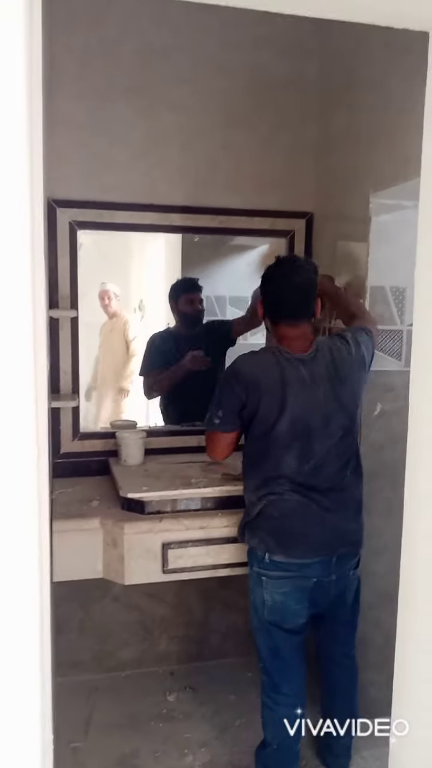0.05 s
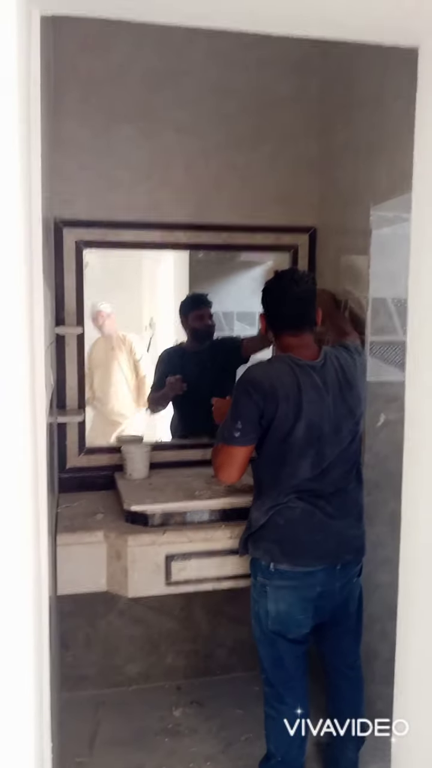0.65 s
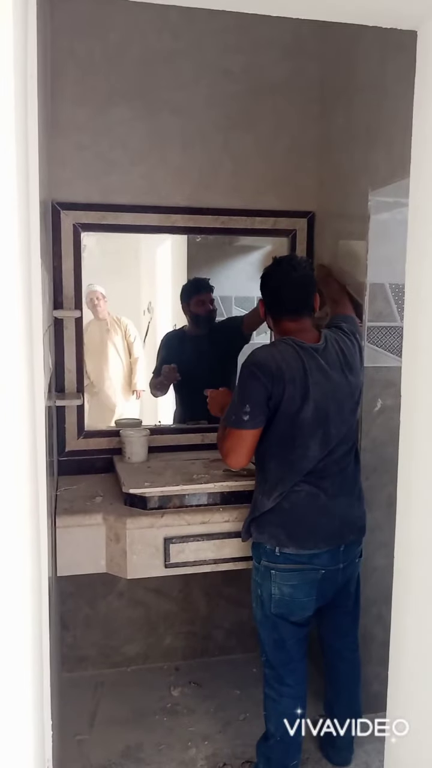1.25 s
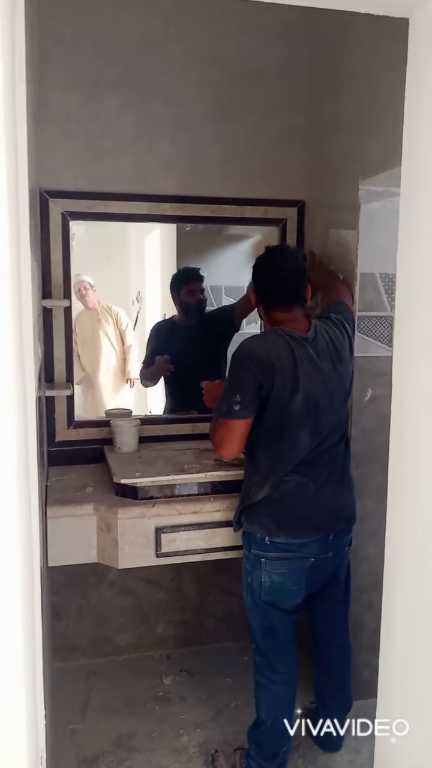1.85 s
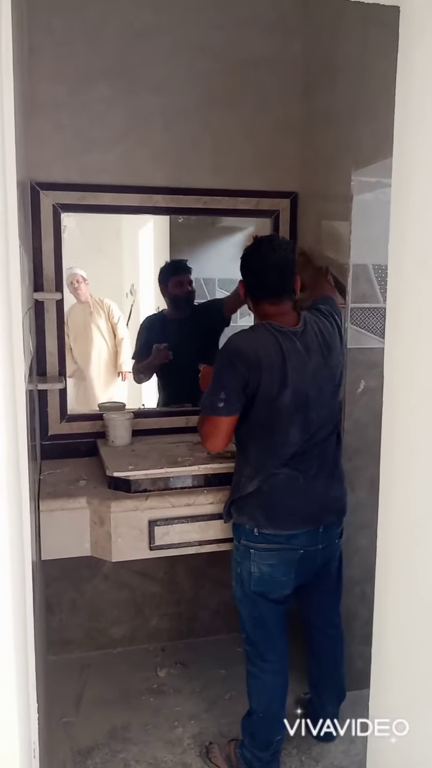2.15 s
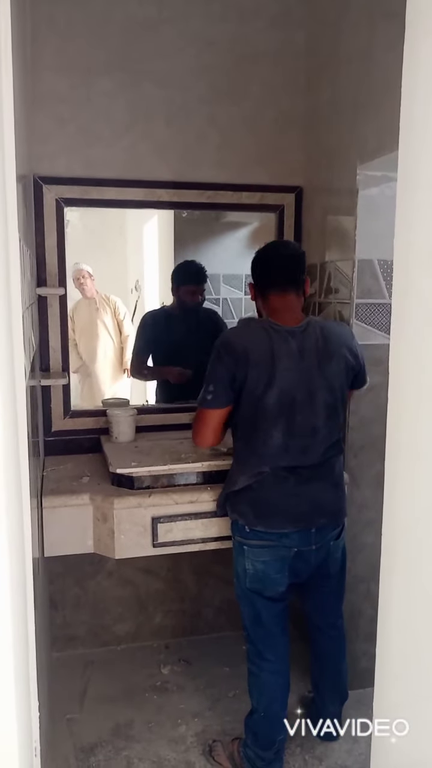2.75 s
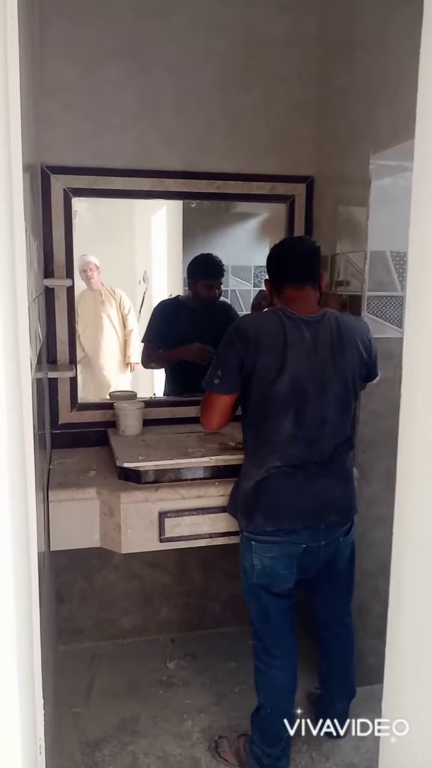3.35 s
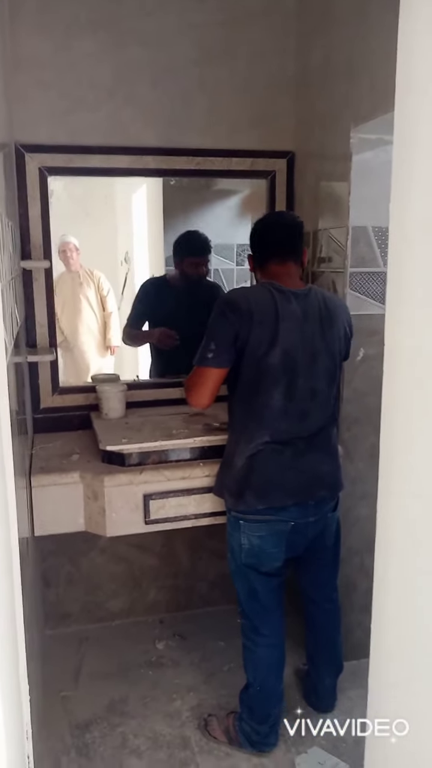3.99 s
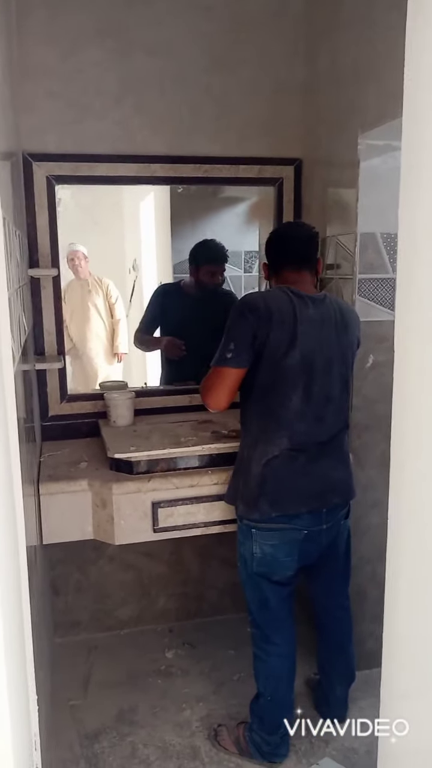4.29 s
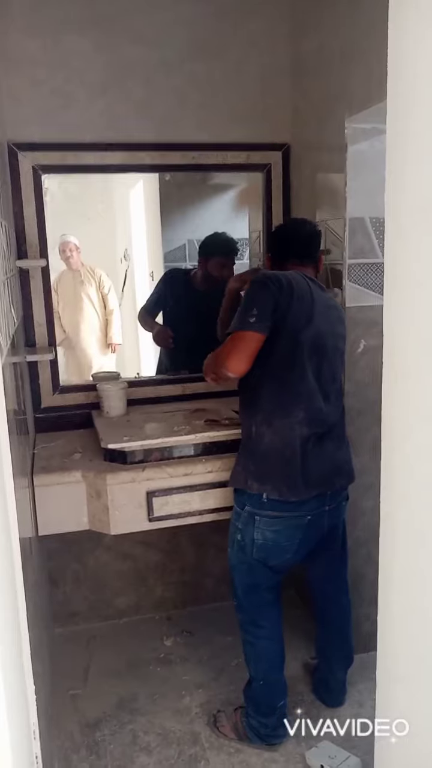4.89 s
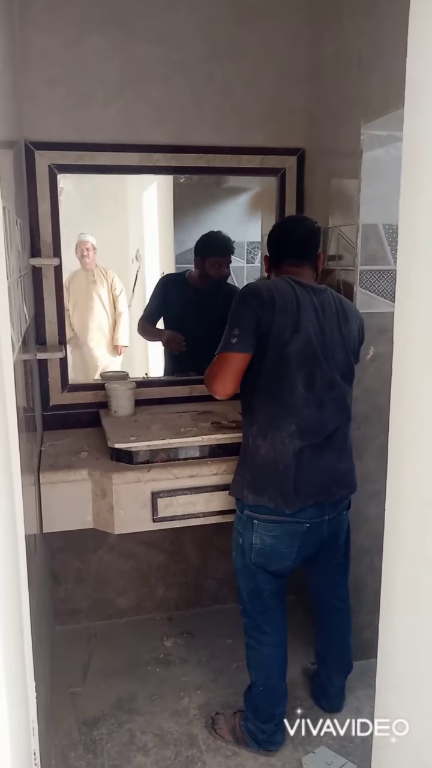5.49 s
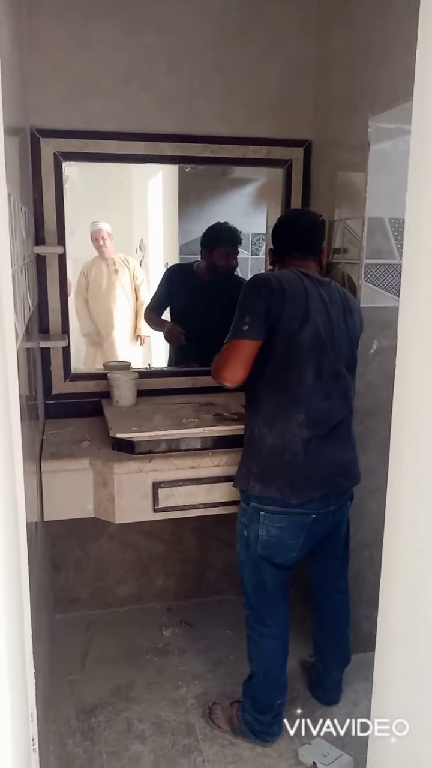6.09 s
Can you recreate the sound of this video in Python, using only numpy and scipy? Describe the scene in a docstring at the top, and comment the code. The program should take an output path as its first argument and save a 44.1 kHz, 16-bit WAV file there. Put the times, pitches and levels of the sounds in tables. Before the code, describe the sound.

Quick metal scrapes on marble, with gritty crunches, ringing clinks and one thin squeal, echo off hard bare walls.

```python
"""A worker scrapes and picks at marble with a steel blade in a small bare bathroom.
Sharp jabs come first: the edge hisses over the stone, rings, clinks and chirps where it catches,
and grit crunches dully where it digs in. Past three seconds a few clinks stand out in a lull.
At four seconds the edge sticks and slips in one thin squeal; softer sweeps and two last clinks follow.
The hard walls answer throughout, over a low murmur of air in the building."""
import sys
import numpy as np
from scipy import signal
from scipy.fft import rfft, irfft, next_fast_len
from scipy.io import wavfile
from scipy.ndimage import uniform_filter1d

SR = 44100
rng = np.random.default_rng(int(sys.argv[2]) if len(sys.argv) > 2 else 0)


def bounce(signal):
    """Save signal as a 16-bit WAV file at the path given by the first command-line argument."""
    frames = np.transpose(np.atleast_2d(signal))
    limited = np.clip(frames, -1, 1)
    pcm = np.round(limited * 32767).astype(np.int16)
    wavfile.write(sys.argv[1], SR, pcm)


N = 270333

# Tone colour of steel on stone: freq_hz, gain_db
EDGE_SPECTRUM = [(30, -55), (100, -18), (300, -14.5), (600, -6), (1000, -2.5), (1600, -0.5), (2000, -2),
                 (3300, 1.5), (5000, 0.5), (7100, 0.5), (7900, -9.5), (10300, -8), (11200, -15),
                 (13400, -18.5), (14700, -8)]
# Strokes of the edge: start_s, length_s, level_db, fizz_db, body_db
EDGE_STROKES = [ (0, 0.13, -44.5, 6, 9.5), (.184, 0.04, -24, -4, -3), (.342, 0.034, -23.5, -1.5, -4.5),
                (0.428, 0.033, -27.5, -4, -3), (0.461, 0.051, -25.5, 1, 4), (.576, 0.051, -24, 0.5, -3),
                (0.699, 0.037, -23, -3, 0.5), (.749, 0.01, -22.5, -2, 2), (.808, 0.028, -21.5, 1.5, 1),
                (.932, 0.077, -23, -0.5, 6), (1.042, 0.0067, -12, -5, -1), (1.05, 0.1, -24, 0, 3),
                (1.26, 0.17, -47, 10, -10), (1.374, .02, -26.5, -8.5, -5), (1.447, .03, -38, 23, -6),
                (1.478, .084, -32.5, 3, -7), (1.629, 0.038, -23.5, 0.5, -2.5),
                (1.796, 0.058, -32.5, 0.5, 7), (1.96, 0.031, -41, 3, 10), (2.057, .02, -28, -3, 6.5),
                (2.163, .02, -28, -11, 9), (2.323, 0.016, -19.5, -8, -7), (2.353, .04, -34, 4, 2),
                (2.394, 0.037, -21.5, 4, 1.5), (2.68, 0.048, -46, -3, -28), (2.98, 0.022, -20, -3, -20),
                (3.122, 0.0098, -23.5, -1.5, -10), (3.544, 0.14, -51.5, 10, 0),
                (3.65, 0.066, -36, 7.5, -13), (3.686, 0.038, -22, -14, 9.5), (3.812, .033, -28.5, -1, -2),
                (3.843, 0.071, -22, -5, 10), (3.988, 0.015, -25, 4.5, -3), (4.12, .07, -33, 2, 7),
                (4.183, 0.021, -19, -1, -18), (4.205, 0.018, -20.5, 7.5, 4), (4.327, .011, -18.5, -1, -21),
                (4.338, .039, -27, 6, 8), (4.4, .07, -29, 2, 2.5), (4.75, 0.025, -39.5, 3, 8),
                (4.835, 0.05, -33.5, 0.5, -6), (4.87, 0.06, -28.5, 3, 6), (4.985, 0.039, -30, 0, -4),
                (5.02, .052, -24, 2, 3), (5.074, 0.099, -31, 1, 2), (5.135, 0.048, -22, 4.5, 6),
                (5.185, 0.045, -26.5, -2, 6), (5.222, 0.039, -21.5, -1, -2), (5.274, 0.071, -32, 1, 0),
                (5.34, .027, -19.5, 1.5, -5), (5.452, 0.032, -34.5, 9, 10), (5.61, 0.042, -30.5, -2, -5),
                (5.715, 0.13, -32, 1.5, -11.5), (5.86, 0.075, -24.5, -0.5, -3.5),
                (5.95, 0.068, -26.5, 0, -9), (6.02, 0.076, -24.5, 5, -1.5), (6.105, 0.054, -26, 2, -1)]
SWEEPS_FROM_S = 4.39  # sharp jabs until here, softer sweeps after
JAB_RISE, SWEEP_RISE = 0.11, 0.27  # share of a stroke spent bearing down

def edge_scrapes():
    """The edge skips over fine grains; each stroke touches the stone a little differently."""
    out = np.zeros(N)
    for start_s, length_s, level_db, fizz_db, body_db in EDGE_STROKES:
        rise_s = length_s * (JAB_RISE if start_s < SWEEPS_FROM_S else SWEEP_RISE)
        push = pressure(rise_s, length_s, sag_db=6.5, release_s=0.0023, trail_db=-13.5, trail_s=0.081)
        grit = grains(len(push), per_s=2200, spread_db=2.0, dust=1.0)
        hiss = coloured(grit, EDGE_SPECTRUM, fizz_db, body_db, ripple_db=2.0)
        add(out, start_s, gain_of(level_db) * pressed(hiss, push))
    return out


# Tone colour of breaking grit: freq_hz, gain_db
GRIT_SPECTRUM = [(30, -62), (100, -22), (260, -18), (400, 0.5), (520, 5), (750, 1), (1100, -1.5), (1600, 0),
                 (2100, -10), (3200, -14.5), (8000, -42), (16000, -31)]
# Digs into the grit: start_s, length_s, level_db
GRIT_DIGS = [(.812, 0.067, -29.5), (.934, 0.066, -24), (1.039, 0.1, -25.5), (1.241, 0.15, -38.5),
             (1.386, 0.017, -27.5), (1.483, 0.11, -27.5), (1.599, 0.12, -33.5), (1.742, 0.018, -23.5),
             (1.845, .02, -28), (1.963, 0.14, -41.5), (2.231, 0.023, -22), (2.978, 0.036, -20),
             (3.122, 0.0098, -19.5), (3.151, 0.053, -42), (3.686, 0.093, -25.5), (3.86, 0.077, -23),
             (4.666, 0.078, -40.5)]

def grit_crunches():
    """Coarse grit breaks under the blade in dull, uneven knocks, then keeps crumbling."""
    out = np.zeros(N)
    for start_s, length_s, level_db in GRIT_DIGS:
        rise_s = 0.073 * length_s
        push = pressure(rise_s, length_s, sag_db=8.0, release_s=0.0047, trail_db=-13, trail_s=0.083)
        grit = grains(len(push), per_s=500, spread_db=5.5, dust=0.67)
        crunch = coloured(grit, GRIT_SPECTRUM, ripple_db=3.0)
        add(out, start_s, gain_of(level_db) * pressed(crunch, push))
    return out


# Modes of the free blade: pitch_hz, t60_s, side_hit_db, tip_hit_db, scraped_db
BLADE_MODES = [(856.4, 0.21, 2.5, -11.5, 10.5), (1536, 0.42, -3, 0.5, 7), (1596, 0.46, -11, -17, 1),
               (2310, 0.45, -13, -21.5, -3), (2690, 0.46, -33, -27, 6), (2400, 0.37, -21, -24, 5),
               (3310, 0.54, -11, -18, -38), (3312, 0.29, 3, -6.5, -0.5), (3840, 0.037, 11.5, -29, -5),
               (4230, 0.11, 0, -19, -14), (5060, 0.15, -22, -32, -27), (5650, 0.28, -18, -30, -9),
               (5650, 0.3, -1, -28, 6), (6380, 0.12, -6, -26, -4), (7110, 0.24, -21, -34, -27),
               (7240, 0.22, -25, -6.5, -20), (8600, 0.29, -37, -28, 5), (9500, 0.2, -25, -30, -1),
               (10400, 0.18, -16, -20, -24), (12290, .2, -27, -35, -24), (14400, 0.14, -24, -7, -20),
               (14560, .22, -25, -20, 0)]
# Modes of the blade bent against the stone: pitch_hz, t60_s, gain_db
BENT_MODES = [(1109, 0.23, -2.5), (1240, .3, -23), (1367, 0.19, -4), (1970, 0.28, 1.5)]
# How hard the strokes drive the bent modes: time_s, drive_db
BEND_DRIVE = [(0, -37), (4.1, -37), (4.22, -13.5), (4.45, -30), (4.8, -45), (5.1, -36), (5.3, -7.5),
              (5.45, -10.5), (5.65, -37)]

def blade_ring(scrapes):
    """The strokes keep the steel ringing, free or bent; contact with the stone shortens the ring."""
    pitch_hz, t60_s, _, _, scraped_db = np.transpose(BLADE_MODES)
    free = driven(scrapes, pitch_hz, t60_s * 0.39, scraped_db, detune=0.0085)
    bent = driven(scrapes * gain_of(follow(BEND_DRIVE)), *np.transpose(BENT_MODES), detune=0.0026)
    return gain_of(-13.5) * free + bent


# Knocks of the blade: start_s, tick_db, fizz_db, ring_db, place (0 side, 1 tip)
BLADE_CLINKS = [(.186, -24, -10, -34, 0.52), (.345, -30, 3, -35, .3), (2.059, -19, -3, -36.5, .7),
                (2.405, -41, 0, -27, 0.26), (3.346, -16, 1.5, -23, 1), (3.443, -35, -32, -34, 0.43),
                (3.523, -32, -32, -44, 0.5), (3.990, -23, -6, -29.5, 0.63), (5.444, -12, -15, -49, 0.13),
                (5.603, -18.5, -2, -24.5, 0.023)]

def blade_clinks():
    """A sharp tick, then the blade rings by where it was struck; returns ticks and rings."""
    pitch_hz, t60_s, side_db, tip_db, _ = np.transpose(BLADE_MODES)
    ticks, rings = np.zeros((2, N))
    t = np.arange(SR // 10) / SR
    snap = np.minimum(t / 0.0022, 1) * np.exp(-t / 0.0049)
    for start_s, tick_db, fizz_db, ring_db, place in BLADE_CLINKS:
        crack = coloured(rng.standard_normal(len(t)), EDGE_SPECTRUM, fizz_db, body_db=-9, ripple_db=2)
        add(ticks, start_s, gain_of(tick_db) * crack * snap)
        tone = ring(pitch_hz, t60_s, side_db + place * (tip_db - side_db), swell_cycles=17)
        brush_db = 2.9 * wobble(len(tone), smooth_samples=250)  # brushing the stone roughens the ring
        add(rings, start_s, gain_of(ring_db + brush_db) * tone)
    return ticks, rings


# The loudest catches of the edge: centre_s, pitch_hz, peak_db, half_length_s
LOUD_CATCHES = [(.35, 2270, -30, 0.014), (.37, 1550, -33.5, 0.022), (.752, 4370, -26, 0.0067),
                (1.07, 1421, -23, .013), (1.39, 3000, -29, 0.013), (1.66, 2670, -30.5, .03),
                (2.411, 3326, -21, .009), (2.412, 4250, -29, .03), (2.999, 6730, -23.5, 0.012),
                (3.385, 1545, -26, .03), (3.994, 5727, -23, 0.009), (4.219, 1157, -30, .018),
                (4.349, 1940, -29.5, .014), (5.17, 5560, -24.5, .035), (5.254, 3617, -27, .013),
                (5.26, 1169, -30, .025), (5.635, 3316, -28, .025), (5.762, 4220, -35.5, 0.035),
                (6.052, 6589, -23.5, 0.017), (6.055, 4070, -26.5, 0.023)]

def edge_chirps():
    """Where the edge catches, a chirp swells and dies on one trembling pitch."""
    out = np.zeros(N)
    for centre_s, pitch_hz, peak_db, half_s in LOUD_CATCHES + faint_catches():
        t = np.arange(-2 * half_s, 2 * half_s, 1 / SR)
        tremble = 1 + 0.02 * wobble(len(t), smooth_samples=70)
        phase = 2 * np.pi * np.cumsum(pitch_hz * tremble) / SR
        swell = np.exp(-(t / half_s) ** 2)
        add(out, centre_s + t[0], gain_of(peak_db) * swell * np.sin(phase))
    return out


def faint_catches(chance=0.6, below_stroke_db=10, half_s=0.016):
    """By chance a stroke catches on a mode of the blade; returns rows like LOUD_CATCHES."""
    pitches_hz = [mode[0] for mode in BLADE_MODES if 1000 < mode[0] < 7100]
    rows = []
    for start_s, length_s, level_db, _, _ in EDGE_STROKES:
        luck, along, pick = rng.random(3)
        if luck < chance and length_s > half_s:
            pitch_hz = pitches_hz[int(pick ** 1.2 * len(pitches_hz))]  # low modes catch more readily
            centre_s = start_s + half_s + along * length_s
            rows.append((centre_s, pitch_hz, level_db - below_stroke_db, half_s))
    return rows


# Contour of the squeal: time_s, pitch_hz, relative_db
SQUEAL_CONTOUR = [(4.04, 7364, -55), (4.08, 7380, -29), (4.116, 7480, -30), (4.132, 7475, -44),
                  (4.142, 7460, -27), (4.174, 7450, -36), (4.186, 7498, -28), (4.3, 7390, -45),
                  (4.32, 7500, -37)]

def edge_squeal():
    """The edge sticks and slips: a thin, unsteady whistle with a faint octave."""
    time_s, pitch_hz, relative_db = np.transpose(SQUEAL_CONTOUR)
    t = np.arange(time_s[0], time_s[-1], 1 / SR)
    waver_hz = 14 * wobble(len(t), smooth_samples=200)
    phase = 2 * np.pi * np.cumsum(np.interp(t, time_s, pitch_hz) + waver_hz) / SR
    whistle = np.sin(phase) + gain_of(-19) * np.sin(2 * phase)
    out = np.zeros(N)
    add(out, time_s[0], gain_of(np.interp(t, time_s, relative_db)) * whistle)
    return gain_of(3) * out


# Early reflections: delay_s, gain
NEAR_WALLS = [(.0031, 0.19), (.0058, -0.19), (.0094, .22)]

def wall_slaps(x):
    """The nearest walls each throw back one quick copy."""
    out = np.zeros(N)
    for delay_s, gain in NEAR_WALLS:
        add(out, delay_s, gain * x)
    return out


# Decay of the bathroom: freq_hz, t60_s
ROOM_DECAY = [(150, 0.88), (600, 0.96), (1700, 0.77), (4500, 0.55), (8000, 0.46), (14000, 0.27)]

def room_tail():
    """Dense reflections off bare stone, the treble dying first."""
    count = SR // 16
    taps = np.zeros(SR + 256)
    signs = rng.choice([-1., 1.], count)
    arrivals = np.arange(count) * 16 + rng.integers(0, 16, count) + 150
    taps[arrivals] = signs
    hz, t, bands = signal.stft(taps, SR, nperseg=256)
    fade = gain_of(-60 * t / at_hz(ROOM_DECAY, hz)[:, None])
    _, tail = signal.istft(bands * fade, SR, nperseg=256)
    return tail / np.linalg.norm(tail)


# Tone colour of the air: freq_hz, gain_db
AIR_SPECTRUM = [(5, -50), (28, -20), (45, -20), (70, -5.5), (110, -13.5), (130, 0), (165, 3), (200, -3),
                (300, -2), (500, -3.5), (900, -9.5), (1600, -19), (3000, -23), (6500, -25), (8500, -40),
                (12000, -49)]
# Slow drift of the air: time_s, level_db
AIR_LEVEL = [(0, -44), (.4, -42.5), (1.2, -43), (2.1, -44), (2.8, -47), (3.6, -43.5), (4.7, -44.5),
             (5.5, -45), (6.1, -41)]

def building_air():
    """Air in the building murmurs low under everything."""
    return gain_of(follow(AIR_LEVEL)) * coloured(rng.standard_normal(N), AIR_SPECTRUM)


def pressure(rise_s, length_s, sag_db, release_s, trail_db, trail_s):
    """The hand bears down, eases off along the stroke and lifts, trailing lightly over the stone."""
    t = np.arange(next_fast_len(int((length_s + 2.5 * trail_s) * SR))) / SR
    rise_s = max(rise_s, 0.0024)
    lifted_s = np.maximum(t - length_s, 0)
    sag = gain_of(-sag_db * np.clip((t - rise_s) / length_s, 0, 1))
    bite = sag * np.exp(-lifted_s / release_s)
    trail = gain_of(trail_db) * np.exp(-(lifted_s / trail_s) ** 2)
    return np.minimum(t / rise_s, 1) * np.maximum(bite, trail)


def pressed(x, push):
    """Shapes x by the hand's pressure, keeping the energy that the pressure gives."""
    return unit_rms(x * push) * np.sqrt(np.mean(push ** 2))


def grains(count, per_s, spread_db, dust):
    """Sparse clicks of uneven size over the smooth hiss of fine dust."""
    size = gain_of(spread_db * np.minimum(rng.exponential(1, count), 3))
    clicks = size * rng.choice([-1, 1], count) * (rng.random(count) < per_s / SR)
    return unit_rms(clicks) + dust * rng.standard_normal(count)


def ring(hz, t60_s, db, swell_cycles=0.01):
    """A sum of dying modes; each builds up over some of its own cycles."""
    t = np.arange(SR // 3)[:, None] / SR
    swell = 1 - np.exp(-t * hz / swell_cycles)
    fade = np.exp(-np.log(1000) * t / t60_s)
    tones = np.sin(2 * np.pi * (hz * t + rng.random(len(hz))))
    return (swell * fade * tones) @ gain_of(db)


def driven(x, hz, t60_s, db, detune):
    """Modes kept ringing by x; the changing grip pulls their pitches a little."""
    def respond():
        modes = ring(hz * (1 + detune * rng.standard_normal(len(hz))), t60_s, db)
        return modes / np.linalg.norm(modes)
    return shifting(x, respond, turns_per_s=1.3)


def shifting(x, respond, turns_per_s, count=4):
    """The hand keeps moving, so x fades in turn through several versions of one response."""
    place = np.arange(N) / SR * turns_per_s * count
    out = np.zeros(N)
    for k in range(count):
        distance = abs((place - k + count / 2) % count - count / 2)
        crossfade = np.cos(np.pi / 2 * np.minimum(distance, 1))
        out += signal.oaconvolve(x * crossfade, respond())[:N]
    return out


def coloured(x, spectrum, fizz_db=0, body_db=0, ripple_db=0):
    """Gives x a spectrum, a high fizz shelf, a low body shelf and narrow chance peaks; rms 1."""
    hz = np.fft.rfftfreq(len(x), 1 / SR)
    ripple = ripple_db * np.interp(hz, np.linspace(0, SR / 2, 90), rng.standard_normal(90))
    fizz = fizz_db / (1 + (7600 / (hz + 1)) ** 8)
    body = body_db / (1 + (hz / 2000) ** 4)
    eq = gain_of(at_hz(spectrum, hz) + fizz + body + ripple)
    return unit_rms(irfft(rfft(x) * eq, len(x)))


def wobble(count, smooth_samples):
    """A smooth random waver; rms 1."""
    return unit_rms(uniform_filter1d(rng.standard_normal(count), size=smooth_samples))


def gain_of(db):
    """Decibels to amplitude."""
    return 10 ** (np.asarray(db) / 20)


def unit_rms(x):
    """Scales to rms 1."""
    return x / np.sqrt(np.mean(x ** 2) + 1e-20)


def at_hz(points, hz):
    """Reads a table along a log-frequency axis."""
    freq_hz, value = np.transpose(points)
    return np.interp(np.log(hz + 1), np.log(freq_hz + 1), value)


def follow(points):
    """Reads a curve at every sample."""
    return np.interp(np.arange(N) / SR, *np.transpose(points))


def add(mix, start_s, sound):
    """Mixes a sound in at start_s."""
    part = mix[max(round(start_s * SR), 0):][:len(sound)]
    part += sound[:len(part)]


def scene():
    """The blade at work, the bathroom's answer and the bed of air, in mono."""
    scrapes, crunches = edge_scrapes(), grit_crunches()
    ticks, rings = blade_clinks()
    edge = scrapes + blade_ring(scrapes) + ticks
    noises = edge + crunches
    squeaks = edge_squeal() + edge_chirps()
    direct = gain_of(-0.5) * noises + squeaks + rings
    send = gain_of(-4.5) * edge + gain_of(-5.5) * crunches + gain_of(-9) * squeaks + gain_of(-12) * rings
    reverb = shifting(send, room_tail, turns_per_s=3, count=5)
    return (direct + wall_slaps(noises) + reverb + building_air())[None]


def record(dry, cutoff_hz=15680):
    """A steep low-pass trims the highest treble."""
    lowpass = signal.firwin(401, cutoff_hz, window=("kaiser", 8), fs=SR)
    return signal.oaconvolve(dry, lowpass[None], "same")


dry = scene()
out = record(dry)
bounce(out)
```